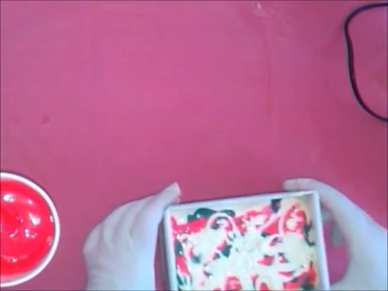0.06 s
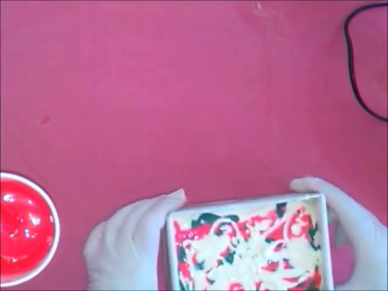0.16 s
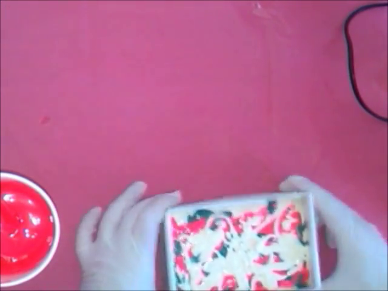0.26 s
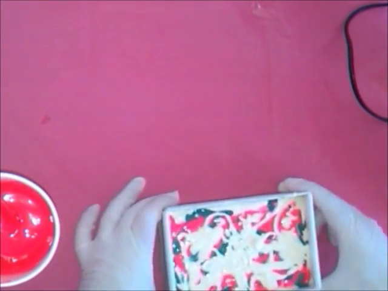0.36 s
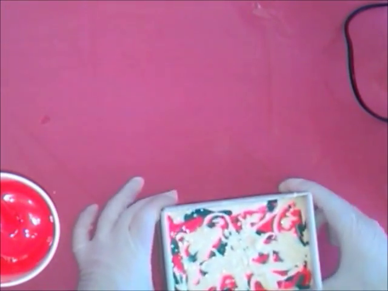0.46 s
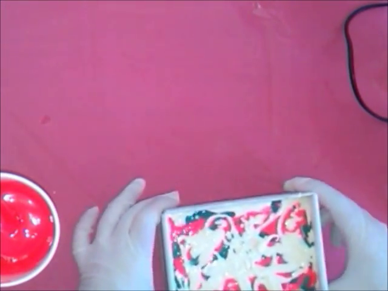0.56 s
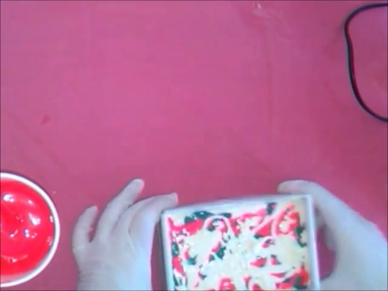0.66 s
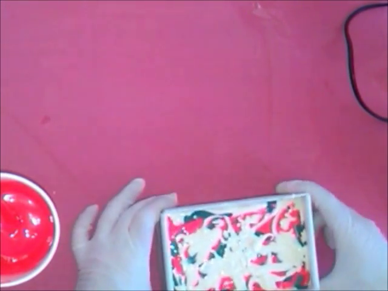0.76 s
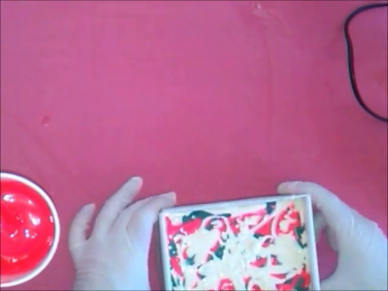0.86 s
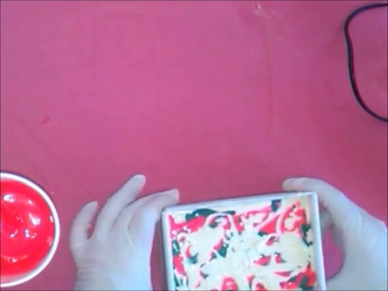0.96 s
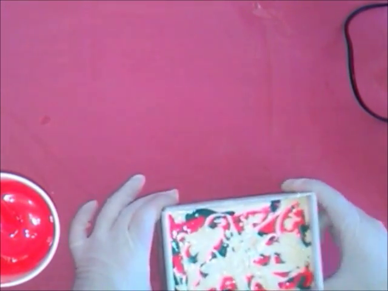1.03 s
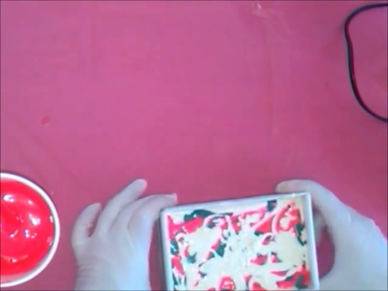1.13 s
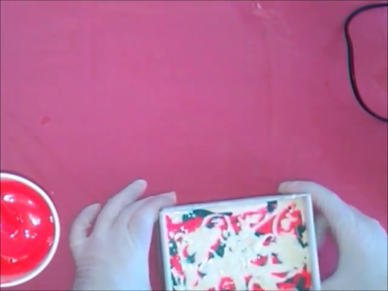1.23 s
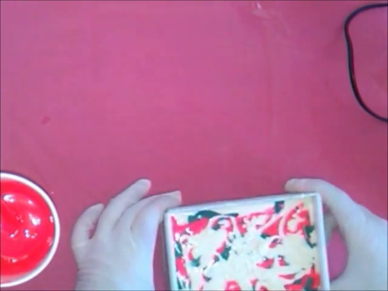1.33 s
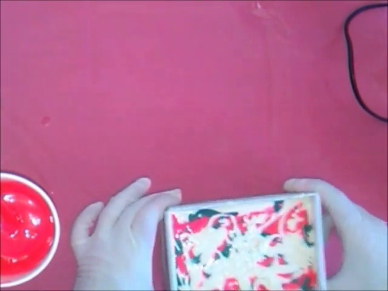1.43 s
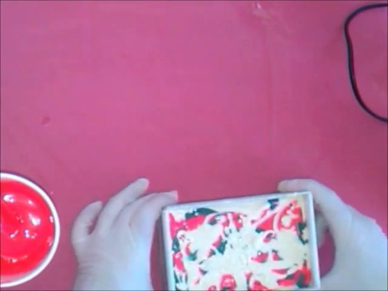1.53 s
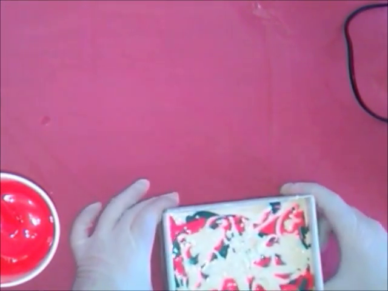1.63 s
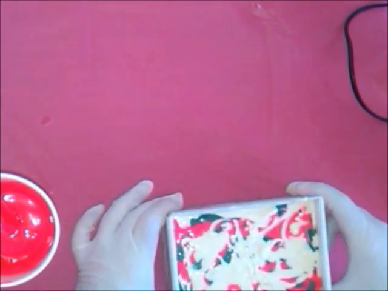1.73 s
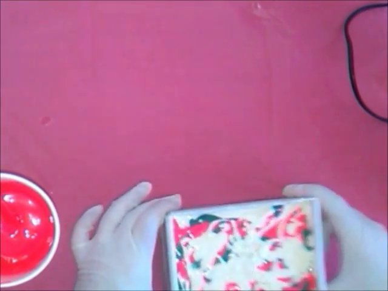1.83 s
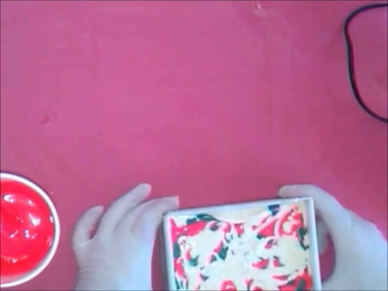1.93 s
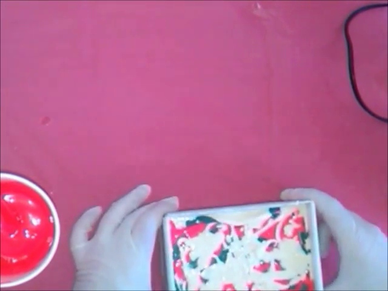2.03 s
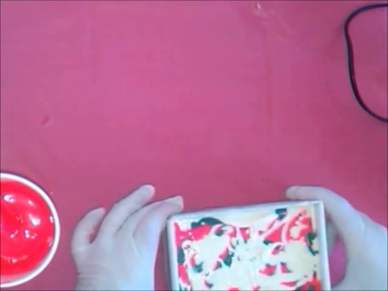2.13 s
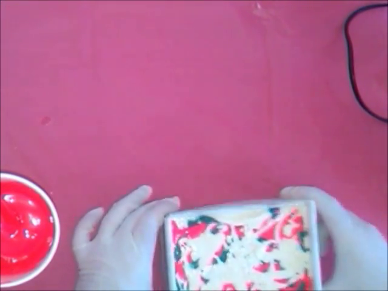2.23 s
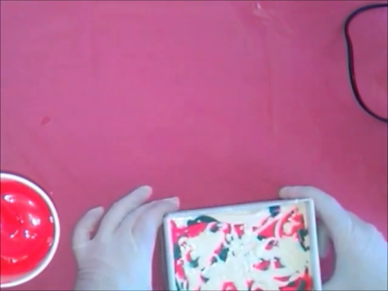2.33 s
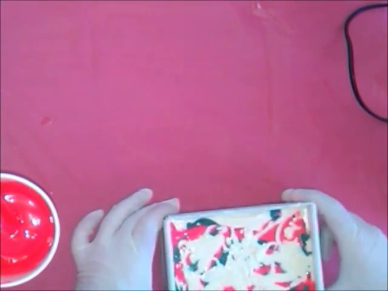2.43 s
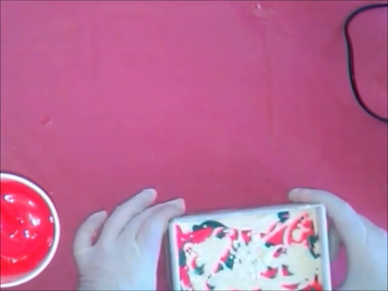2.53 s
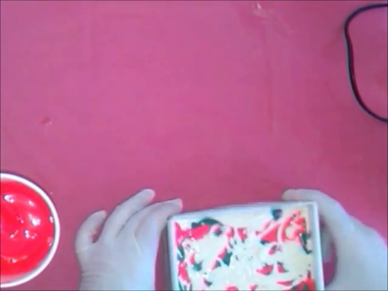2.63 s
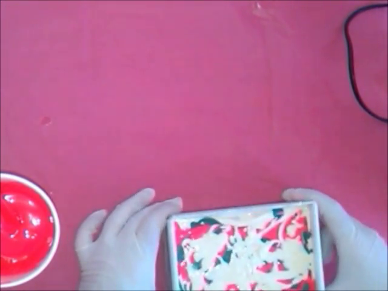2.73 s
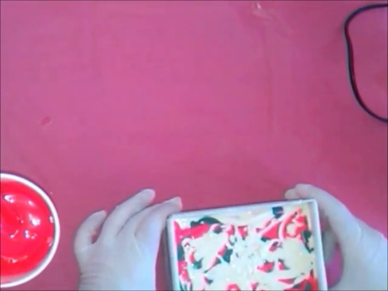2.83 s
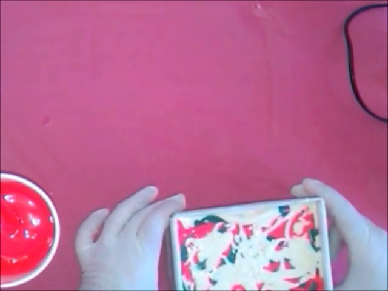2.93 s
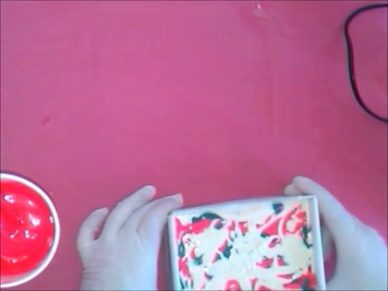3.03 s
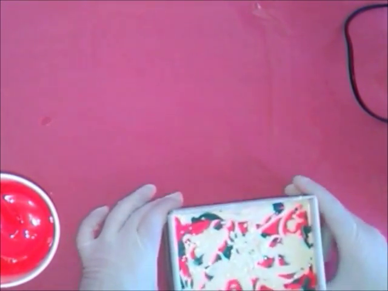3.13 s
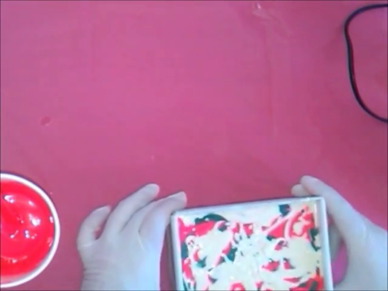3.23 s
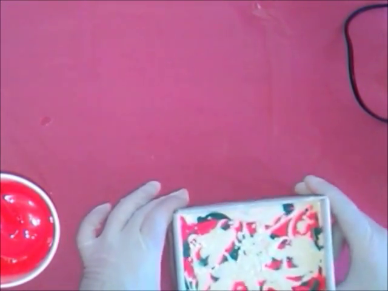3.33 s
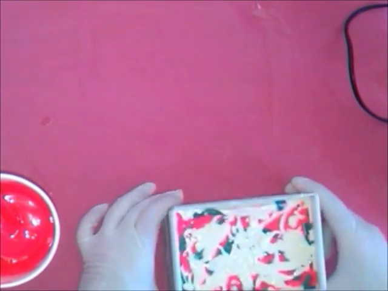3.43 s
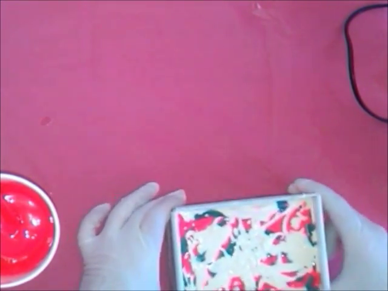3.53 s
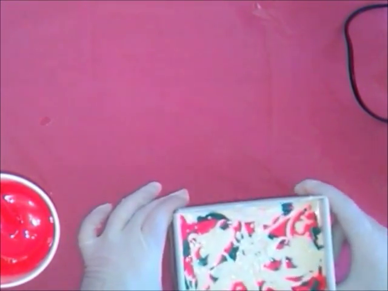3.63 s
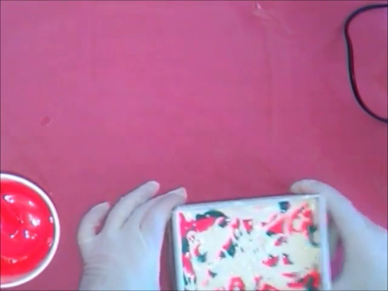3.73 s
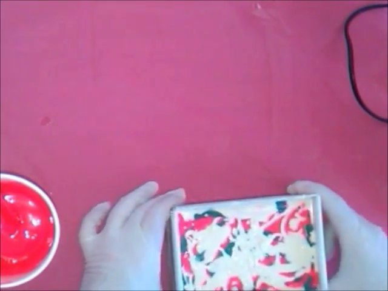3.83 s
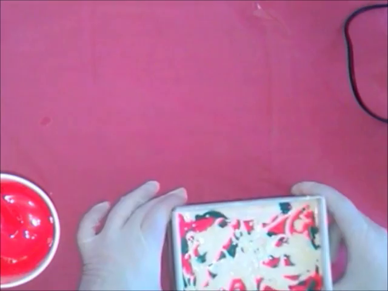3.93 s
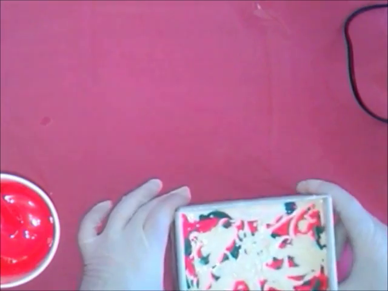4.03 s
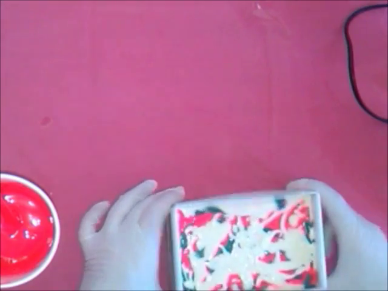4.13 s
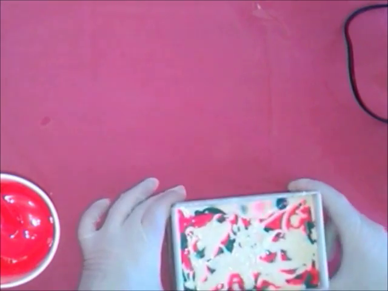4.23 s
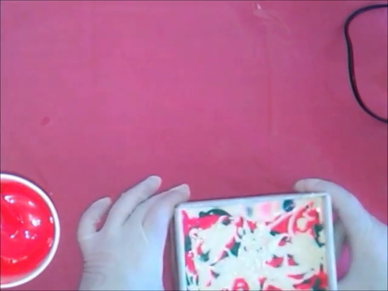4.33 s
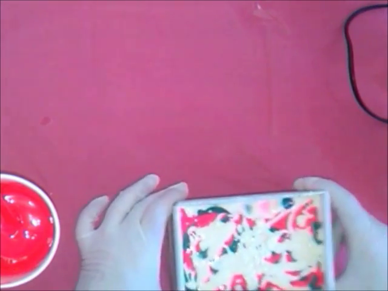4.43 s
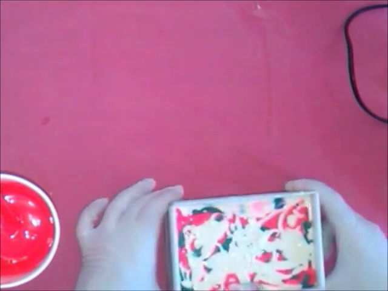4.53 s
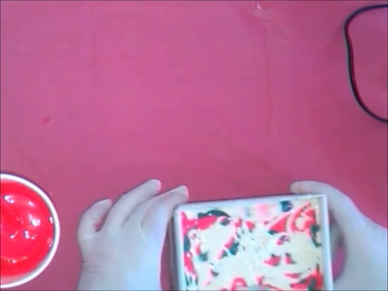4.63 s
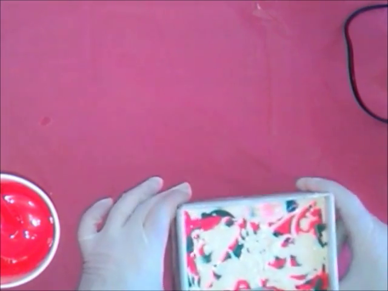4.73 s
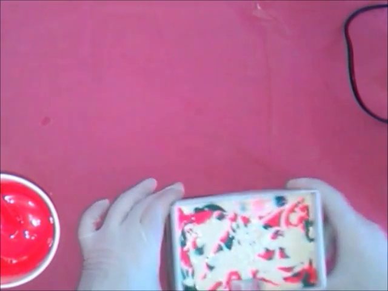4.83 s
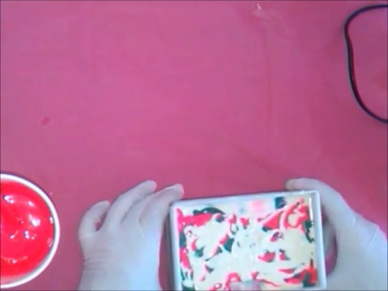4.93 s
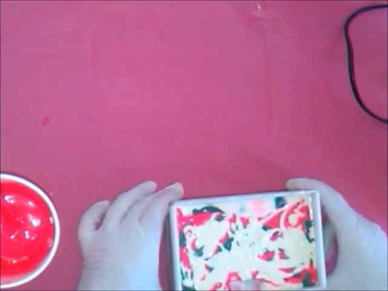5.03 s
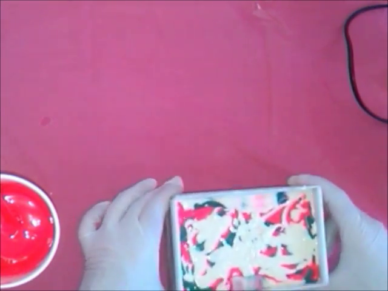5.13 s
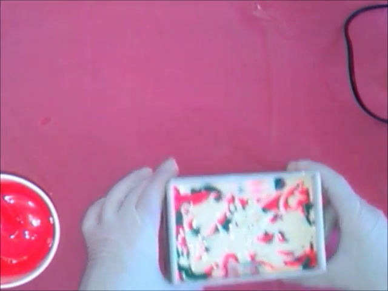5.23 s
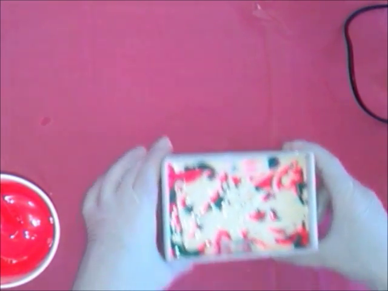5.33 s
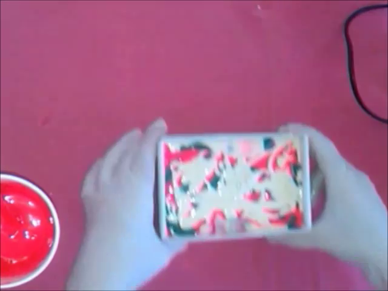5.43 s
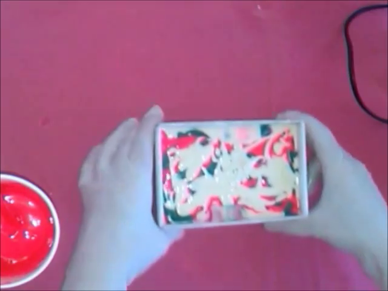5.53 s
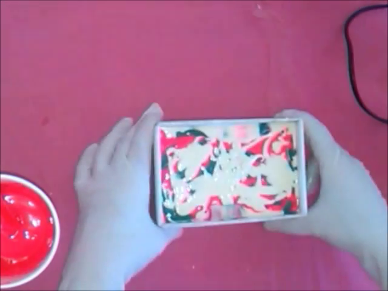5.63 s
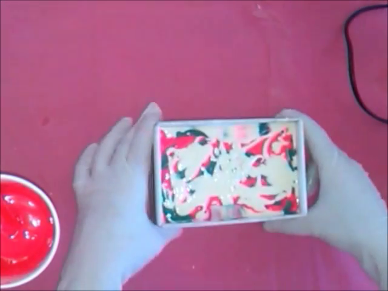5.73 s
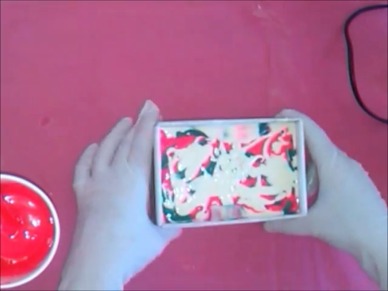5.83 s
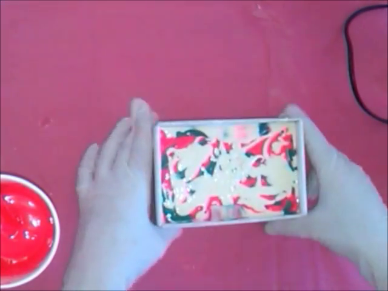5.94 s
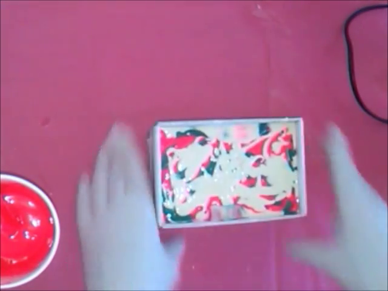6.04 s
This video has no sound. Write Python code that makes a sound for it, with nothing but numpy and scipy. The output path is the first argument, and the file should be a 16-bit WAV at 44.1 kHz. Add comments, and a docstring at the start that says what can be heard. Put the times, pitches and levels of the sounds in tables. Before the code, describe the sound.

A filled mould is banged hard on a table thirteen times at a steady quick pace, clacking and rattling in a small room.

```python
"""A low, wavering hum and soft hiss open in a small, bare room, and a mould full of batter bumps faintly twice.
Thirteen bangs on a table follow: each time an edge touches and skids, then two sides slap down milliseconds apart.
Every slap drives a filtered mould clack with room echoes; the table thuds and decaying sines ring in table and room.
Last come softer bumps, ticks with a hollow note, as the mould is pushed forward and set down."""
import sys
import numpy as np
from scipy import signal
from scipy.fft import rfft, irfft
from scipy.io import wavfile
from scipy.ndimage import uniform_filter1d

SR = 44100
rng = np.random.default_rng(int(sys.argv[2]) if len(sys.argv) > 2 else 0)


def int16_out(signal):
    """Quantize to a 16-bit WAV file."""
    q = np.round(np.clip(np.atleast_2d(signal).T, -1, 1) * 32767)
    wavfile.write(sys.argv[1], SR, q.astype(np.int16))


N = 268128  # length of the scene in samples
RING = 2 ** 14  # length of one response in samples
T = np.arange(RING) / SR  # time within one response in seconds

# Decay of the room's echoes. Each row: band centre in Hz, time to fall 60 dB in seconds.
ROOM_DECAY = [(100, 0.86), (260, 0.34), (700, 0.3), (1800, 0.25), (4000, 0.28), (8000, 0.26), (13000, 0.21)]
# Colour of room air and microphone hiss. Each row: frequency in Hz, relative density in dB.
AIR_COLOUR = [(25, -36), (40, -26.5), (64, -2), (110, -8), (165, 0.5), (240, -4.5), (320, -10),
              (450, -16.5), (900, -19), (1600, -23), (3000, -29), (6500, -29.5), (11000, -35), (16000, -37)]
AIR_DB = -65  # RMS level before the background's own trim
# Lines of the hum. Each row: centre frequency in Hz, RMS level before it wavers in dB.
HUM_LINES = [(97, -93.5), (150, -75), (248, -76), (377, -89.5), (500, -90.5)]
# Soft bumps of the mould in the hands and on the table.
# Each row: start in seconds, force in dB, weight put on the table in dB.
SOFT_BUMPS = [(0.067, -37, 2), (0.091, -38, -18), (5.700, -38, -5), (5.7065, -25, -11), (5.716, -26, -13),
              (5.728, -29.5, -0.5), (6.021, -49, -8)]
# Basic tone of the mould's clack. Each row: frequency in Hz, relative level in dB.
CLACK_TONE = [(60, -19), (110, -1), (300, 5), (600, 4), (850, 2), (1100, -1), (1600, 0.5), (2300, -4.5),
              (3200, 0), (5000, 0.28), (6500, 0.5), (9000, 2), (11000, -5), (16000, -10.5)]
# Bangs of the mould on the table. Each row: first slap in seconds, force in dB, skid before it in milliseconds,
# low knock in dB, mould body in dB, wall resonance in Hz, wall rattle in dB.
TABLE_BANGS = [ (0.4255, -1.34, 6.6, .5, -1.5, 5040, 2.5), (0.8296, -0.5, 3.1, 3, -.5, 4000, 2),
               (1.2225, -0.66, 1.87, -4.5, -1, 3860, 2), (1.6248, 0.9, 3.8, 0.5, -1.5, 4220, 9),
               (2.012, 1.4, 2.6, -1.5, 2.5, 4840, 0.5), (2.3917, 0.43, 1.95, 3, 1.5, 3780, 2.5),
               (2.7849, 0, 3.5, -1.5, 2.5, 4050, 3.5), (3.1822, -2.5, 6.5, 3, 3, 4280, 0),
               (3.5503, 0.06, 2.7, 0, -3.5, 3500, 6), (3.9054, -0.35, 2.8, -3, 1, 3600, 4),
               (4.2718, 1.13, 1.56, 0, -0.5, 4500, 12.5), (4.6312, -0.83, 3.54, 2, 8, 3200, 3.5),
               (4.9857, -1.8, 5.7, 1, 2, 4810, -0.5), ]
# Low modes of the table and the room around it.
# Each row: frequency in Hz, relative level in dB, time to fall 60 dB in seconds.
LOW_MODES = [(90.4, -41.5, 0.39), (134, -42, 0.045), (151.45, -33.5, 0.31), (164.7, -39.5, 0.42),
             (214, -29, 0.046), (228, -43, 0.39), (255.8, -45, 0.36), (290.4, -43, 0.3),
             (297.5, -34.5, 0.1), (345.5, -51, 0.33), (374.4, -32.5, 0.061), (390.2, -36.5, 0.11),
             (490, -44.5, 0.06), (508, -42.5, 0.11), (537, -45, 0.14), (619.8, -40, 0.28),
             (656, -47.5, 0.27), (683, -36.5, 0.065), (823, -40.5, 0.1)]

TOUCH_DB = -18  # the edge that grazes the table first
SECOND_SHARE = 0.48  # the second slap's share of the slap energy
ROCK_S, ROCK_SPREAD = 0.0043, 0.15  # typical time between the slaps in seconds; its relative scatter
THUD_LEAD_S, THUD_DB = 0.0027, -0.88  # the table starts to give just before the first slap
# Rim and top treble at zero rattle, and the dB each gains per dB of rattle.
RIM_HZ, RIM_DB, RIM_PER_RATTLE = 7870, 7.5, 0.2
TREBLE_DB, TREBLE_PER_RATTLE = -5, 0.25
LOCK_DB = 14  # rattle at which the rim is pulled fully to the wall's octave
TOP_HZ = 15900


def undb(db):
    """Turn decibels into gain."""
    return 10 ** (np.asarray(db) / 20)


def curve(points, hz):
    """Read (Hz, value) points on a log-frequency axis."""
    at, value = np.transpose(points)
    return np.interp(np.log(hz + 1), np.log(at), value)


def fade(t60):
    """Exponential decay that is 60 dB down after t60 seconds."""
    return np.exp(-np.log(1000) * T / t60)


def hump(hz, centre_hz, width_hz):
    """Bell-shaped resonance, 1 at its centre."""
    return 1 / (1 + (2 * (hz - centre_hz) / width_hz) ** 2)


def causal(db):
    """Minimum-phase response: this spectrum with its energy as early as possible."""
    cepstrum = irfft(db * np.log(10) / 20)
    # fold the backward half of the cepstrum onto the forward half
    cepstrum[1:RING // 2] *= 2
    cepstrum[RING // 2 + 1:] = 0
    return irfft(np.exp(rfft(cepstrum)))


def add(track, s, sound):
    """Mix a sound into the track at time s in seconds."""
    start = max(int(round(s * SR)), 0)
    part = sound[:max(len(track) - start, 0)]
    track[start:start + len(part)] += part


def walk(rate):
    """Smooth random wander around zero, fed by about `rate` new values a second."""
    size = int(SR / rate)
    steps = np.repeat(rng.standard_normal(N // size + 1), size)[:N]
    return uniform_filter1d(uniform_filter1d(steps, size), size)


def background(air_db=-1, waver_db=3, drift_hz=1.5, hiss_db=5):
    """Noise coloured as room air and microphone hiss, under hum lines that waver in pitch and level."""
    hz = np.fft.rfftfreq(N, 1 / SR)
    colour = curve(AIR_COLOUR, hz) + hiss_db * hump(hz, centre_hz=7900, width_hz=1700)
    air = irfft(rfft(rng.standard_normal(N)) * undb(colour), N)
    out = air / air.std() * undb(AIR_DB + air_db)
    for line_hz, db in HUM_LINES:
        phase = 2 * np.pi * np.cumsum(line_hz + drift_hz * walk(rate=10)) / SR
        gain = np.sqrt(2) * undb(db + waver_db * walk(rate=16))  # RMS to peak
        out += gain * np.sin(phase)
    return out


def reflections():
    """Dense echoes of unit energy; each band of the noise dies at its own rate."""
    hz = np.fft.rfftfreq(RING, 1 / SR)
    centres, t60s = np.transpose(ROOM_DECAY)
    noise = rfft(rng.standard_normal(RING))
    tail = 0
    for t60, weights in zip(t60s, np.eye(len(centres))):
        band = irfft(noise * np.interp(hz, centres, weights))
        tail = tail + band * fade(t60)
    return tail / np.linalg.norm(tail)


def contact(room, direct_db=-13, chatter_db=-5.0, chatter_t60=0.02, room_db=-1, moved=0.54):
    """One contact at the microphone: a crack, brief chatter, then echoes that change with the spot hit."""
    share = np.clip(moved, 0, 1)  # energy share of fresh echoes
    echoes = np.sqrt(1 - share) * room + np.sqrt(share) * reflections()
    chatter = rng.standard_normal(RING) * fade(chatter_t60)
    out = undb(room_db) * echoes
    out += undb(chatter_db) * chatter / np.linalg.norm(chatter)
    out[0] += undb(direct_db)
    return out


def clack(body_db, wall_hz, wall_db, rim_hz, rim_db, treble_db, knock_db=0):
    """The mould's response: a low knock, a broad body, and wall and rim resonances that shift with the grip."""
    hz = np.fft.rfftfreq(RING, 1 / SR)
    db = curve(CLACK_TONE, hz)
    db += knock_db * hump(hz, centre_hz=270, width_hz=180)
    db += body_db * hump(hz, centre_hz=1350, width_hz=2500)
    db += wall_db * hump(hz, wall_hz, width_hz=1100)
    db += rim_db * hump(hz, rim_hz, width_hz=1600)
    # a hard-rattling wall adds a weaker overtone
    db += 0.55 * wall_db * hump(hz, 3.15 * wall_hz, width_hz=1500)
    db += treble_db * hump(hz, centre_hz=12400, width_hz=4800)
    return causal(db)


def thud(hz=71.3, db=-22.0, rise_s=0.025, hold_s=0.053, steep=2.7, lag_s=0.00052,
         knock_hz=146.0, knock_db=-21.0, knock_t60=0.065):
    """The loaded table top gives with a dead knock, then bounces a few cycles until the hands press it still."""
    t = np.maximum(T - lag_s, 0)
    swell = (1 - np.exp(-t / rise_s)) * np.exp(-(t / hold_s) ** steep)
    bounce = np.sin(2 * np.pi * hz * t) * swell
    knock = np.sin(2 * np.pi * knock_hz * t) * (1 - np.exp(-t / 0.001)) * fade(knock_t60)
    return undb(db) * bounce - undb(knock_db) * knock


def bumps(room, hollow_hz=360, hollow_t60=0.067, hollow_db=-20, low_hz=165, low_db=0):
    """Gentle contacts: a small tick, the hollow two-tone note of the mould and a little table thud."""
    out, table_thud = np.zeros(N), thud()
    tick = clack(body_db=-4.0, wall_hz=6300, wall_db=1.5, rim_hz=7850, rim_db=5.5, treble_db=-5)
    tones = np.sin(2 * np.pi * hollow_hz * T) + undb(low_db) * np.sin(2 * np.pi * low_hz * T)
    hollow = tones * fade(hollow_t60)
    for s, force_db, weight_db in SOFT_BUMPS:
        force = undb(force_db)
        add(out, s, force * signal.fftconvolve(contact(room), tick))
        add(out, s, force * (undb(hollow_db) * hollow + undb(weight_db) * table_thud))
    return out


def scuff(length_s, start_db=-12, dull_hz=3500):
    """From the first touch to the slap the edge skids on the table: dulled noise that grows louder."""
    size = max(int(length_s * SR), 8)
    grains = rng.standard_normal(RING)[:size] * undb(np.linspace(start_db, 0, size))
    return signal.lfilter(*signal.butter(1, dull_hz, fs=SR), grains)


def slaps(room, skid_s, rock_s, scuff_db=-31):
    """An edge touches and skids, one side slaps down, and the mould rocks onto the other."""
    blows, share = np.zeros(RING), np.clip(SECOND_SHARE, 0, 1)
    add(blows, 0, undb(TOUCH_DB) * contact(room))
    add(blows, 0, undb(scuff_db) * scuff(skid_s))
    add(blows, skid_s, np.sqrt(1 - share) * contact(room))
    add(blows, skid_s + rock_s, np.sqrt(share) * contact(room))
    return blows


def rattled(knock_db, body_db, wall_hz, rattle_db):
    """The clack for one grip: harder wall rattle brightens the rim and pulls it to the wall's octave."""
    pull = min(undb(2 * (rattle_db - LOCK_DB)), 1)
    rim_hz = RIM_HZ + pull * (2 * wall_hz - RIM_HZ)
    rim_db = RIM_DB + RIM_PER_RATTLE * rattle_db
    treble_db = TREBLE_DB + TREBLE_PER_RATTLE * rattle_db
    return clack(body_db, wall_hz, rattle_db, rim_hz, rim_db, treble_db, knock_db)


def low_ring(rise_s=0.0016):
    """The low modes of table and room as decaying sines, one per row; neighbours swing against each other."""
    modes = []
    for k, (hz, db, t60) in enumerate(LOW_MODES):
        modes.append((-1) ** k * undb(db) * np.sin(2 * np.pi * hz * T) * fade(t60))
    return np.array(modes) * (1 - np.exp(-T / rise_s))


def room_boom(hz=63, db=-57, t60=2.7):
    """The room's deepest mode hums on between the blows as a slowly decaying sine."""
    t = np.arange(2 * SR) / SR
    return undb(db - 60 * t / t60) * np.sin(2 * np.pi * hz * t)


def wall_ring(wall_hz, width_hz=2600, t60=0.46):
    """The mould's walls ring on in a cluster of close modes, made of decaying band-shaped noise."""
    hz = np.fft.rfftfreq(RING, 1 / SR)
    ring = irfft(rfft(rng.standard_normal(RING)) * hump(hz, wall_hz, width_hz) ** 2)
    return ring / ring.std() * fade(t60)


def bangs(room, clack_db=3, scatter_db=1.86, wall_ring_db=-55.5, ring_db=1.35):
    """The slaps make the mould clack and its walls rattle; the weight of the batter drives table and room."""
    out, table_thud, modes, boom = np.zeros(N), thud(), low_ring(), room_boom()
    for s, force_db, skid_ms, knock_db, body_db, wall_hz, rattle_db in TABLE_BANGS:
        skid_s = skid_ms / 1000
        rock_s = ROCK_S * np.exp(ROCK_SPREAD * rng.standard_normal())
        blows = slaps(room, skid_s, rock_s)
        mould = rattled(knock_db, body_db, wall_hz, rattle_db)
        add(out, s - skid_s, undb(force_db + clack_db) * signal.fftconvolve(blows, mould))
        add(out, s, undb(force_db + wall_ring_db + rattle_db) * wall_ring(wall_hz))
        # each low mode's level is scattered a little at random per bang
        mode_gains = undb(ring_db + knock_db + scatter_db * rng.standard_normal(len(modes)))
        low_end = table_thud + mode_gains @ modes
        weight = undb(force_db + THUD_DB)
        add(out, s - THUD_LEAD_S, weight * low_end)
        add(out, s - THUD_LEAD_S, weight * boom)
    return out


def scene():
    """Background, bumps and bangs in one room, heard by one microphone."""
    room = reflections()
    return (background() + bumps(room) + bangs(room))[None]


def record(dry):
    """The recorder cuts the top with a steep elliptic low-pass."""
    low_pass = signal.ellip(10, 0.1, 70, TOP_HZ, fs=SR, output="sos")  # order, ripple dB, stopband dB
    return signal.sosfilt(low_pass, dry)


dry = scene()
out = record(dry)
int16_out(out)
```